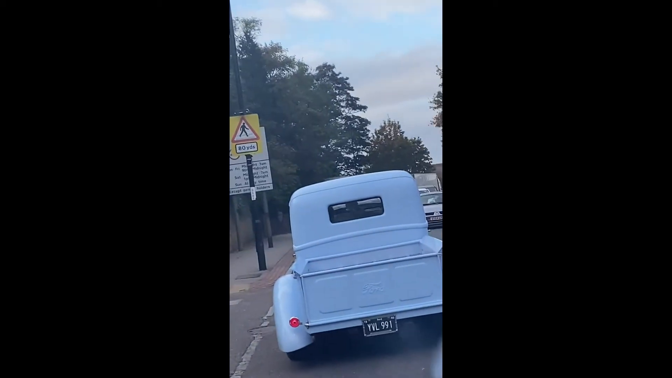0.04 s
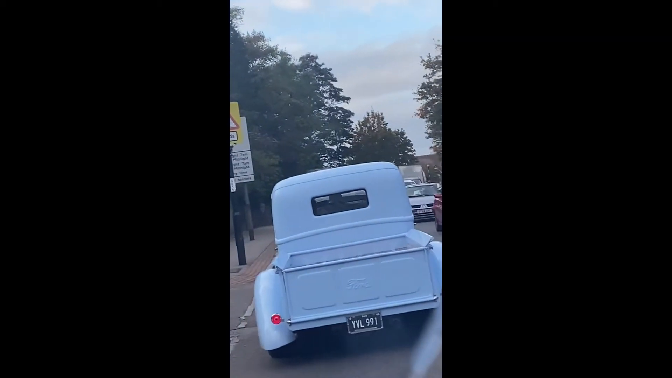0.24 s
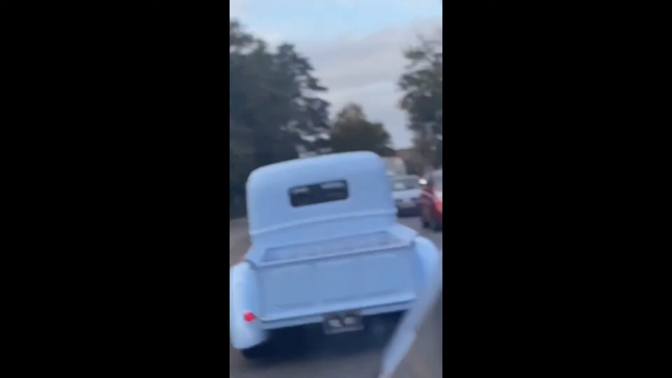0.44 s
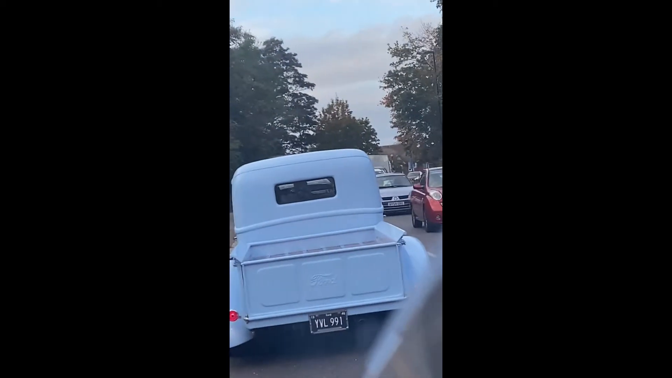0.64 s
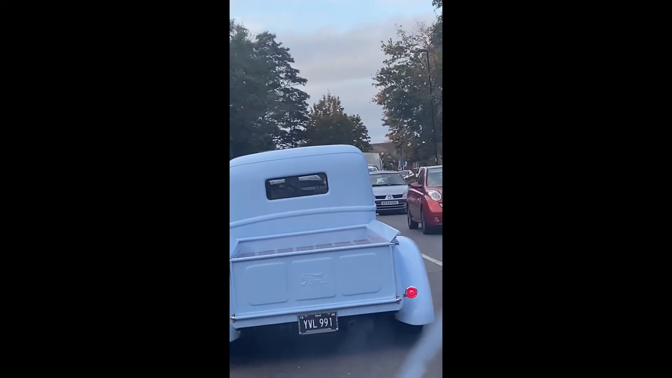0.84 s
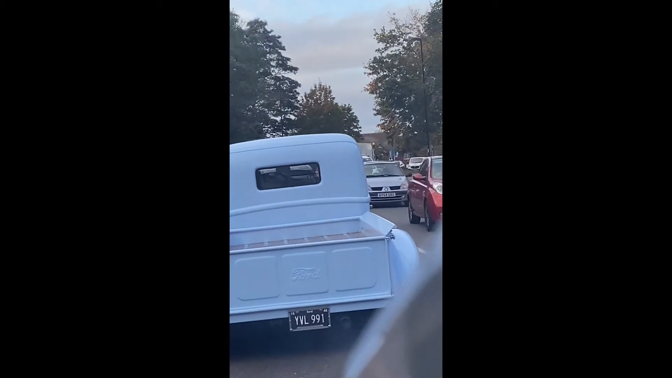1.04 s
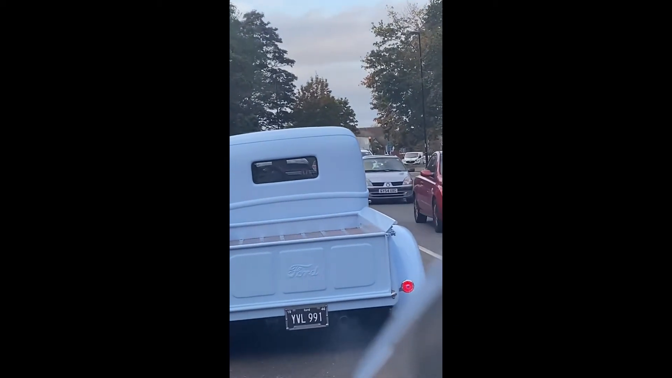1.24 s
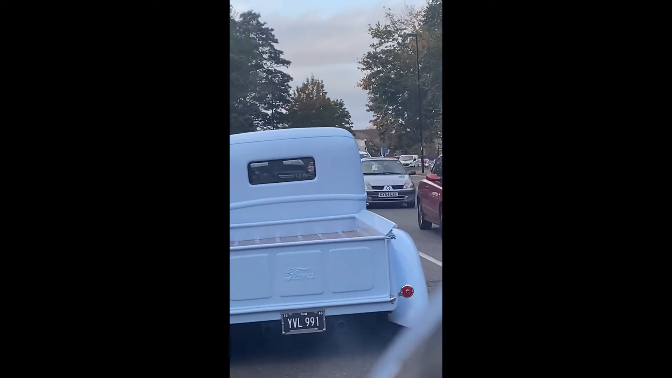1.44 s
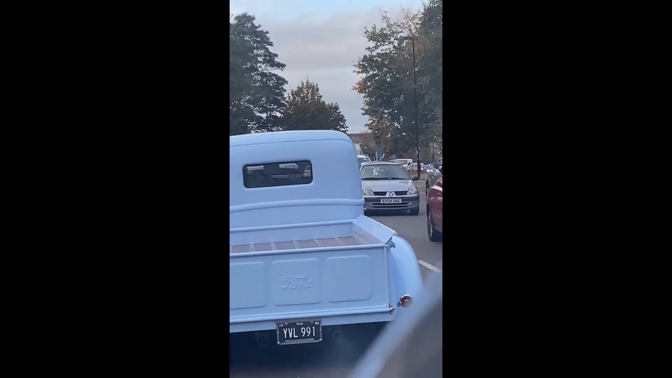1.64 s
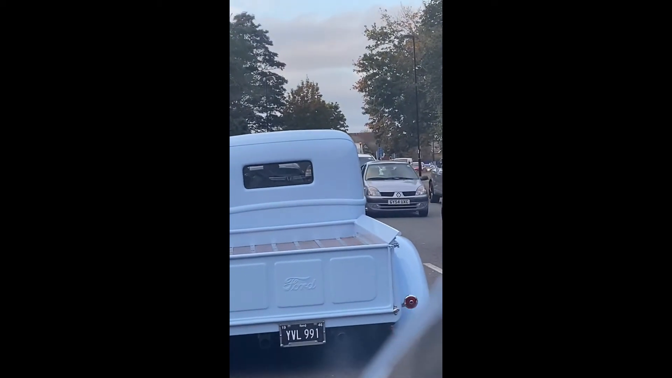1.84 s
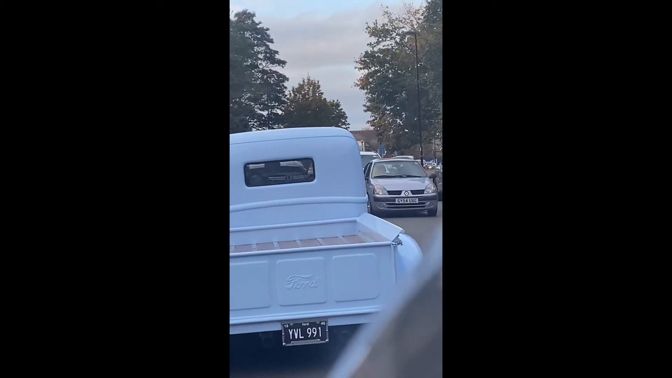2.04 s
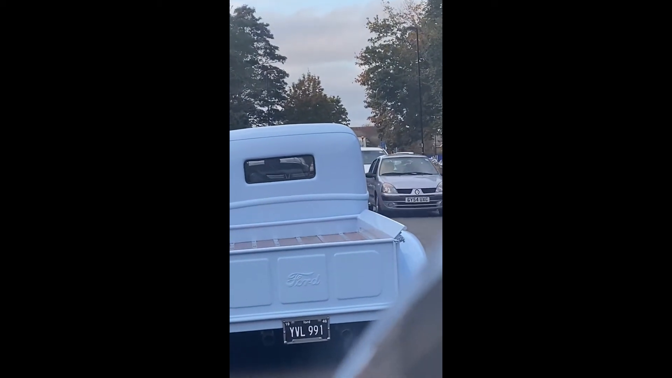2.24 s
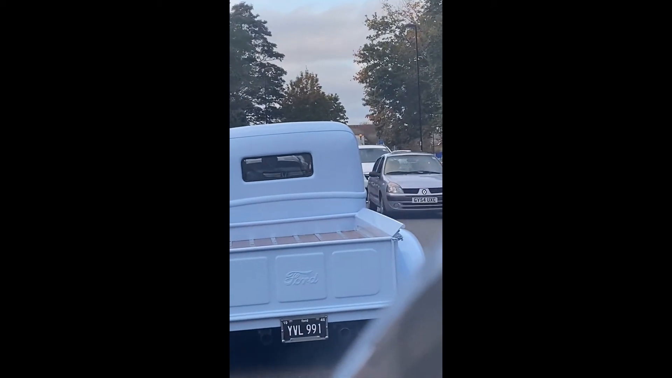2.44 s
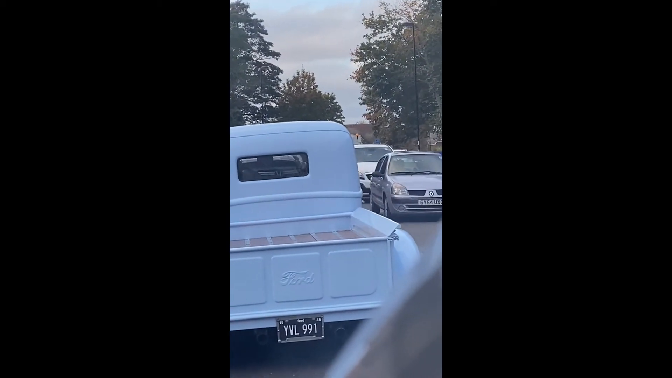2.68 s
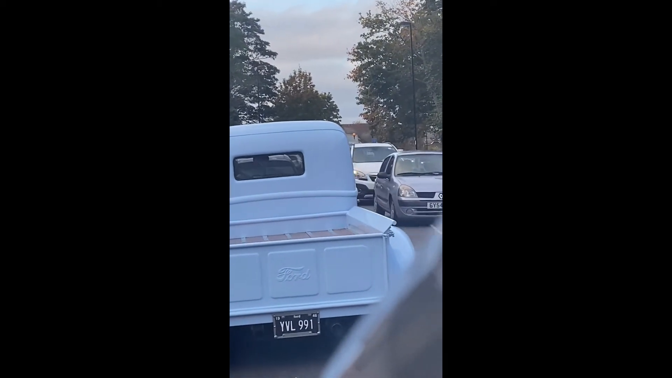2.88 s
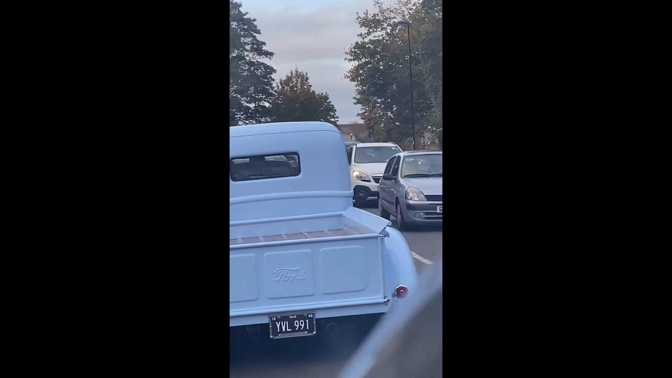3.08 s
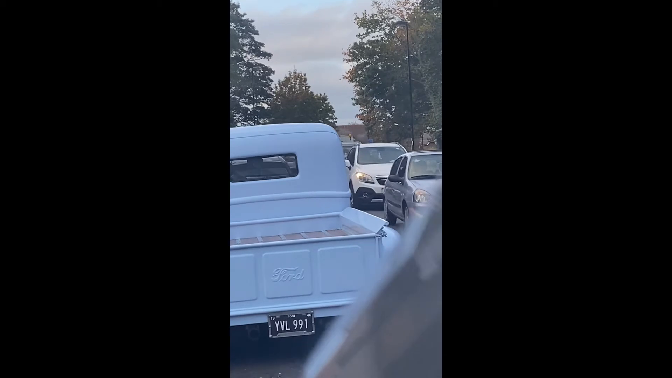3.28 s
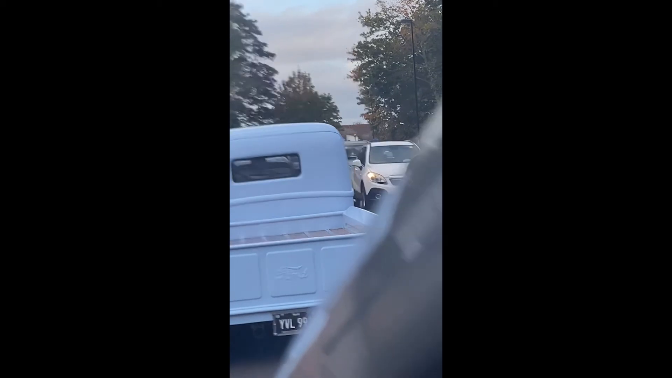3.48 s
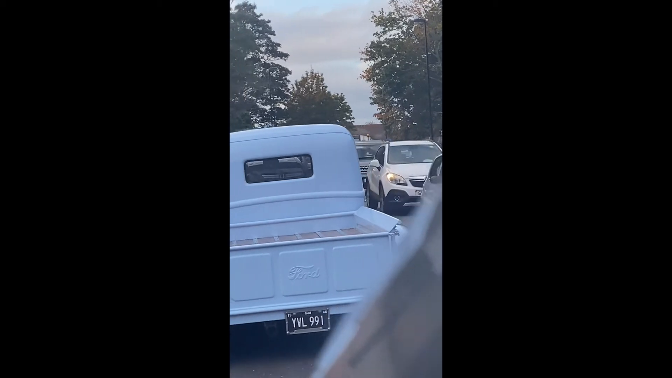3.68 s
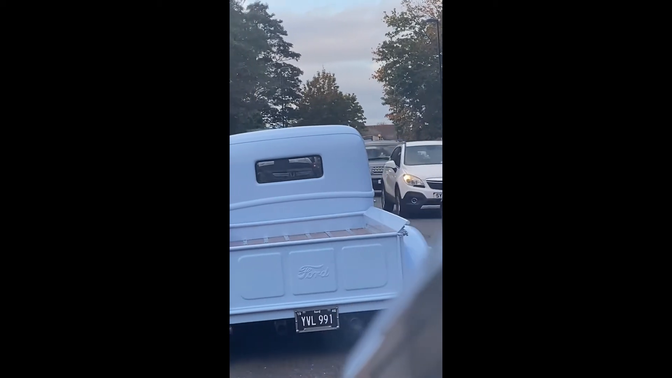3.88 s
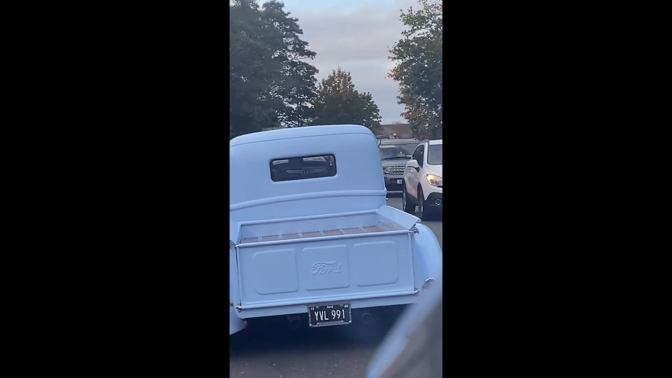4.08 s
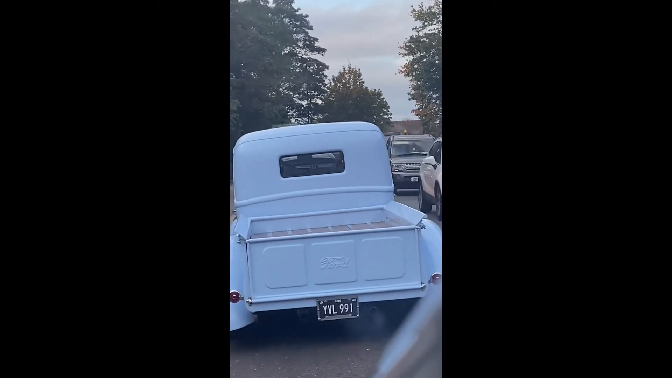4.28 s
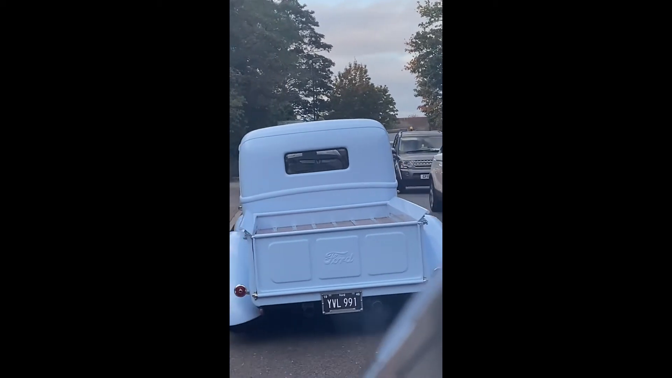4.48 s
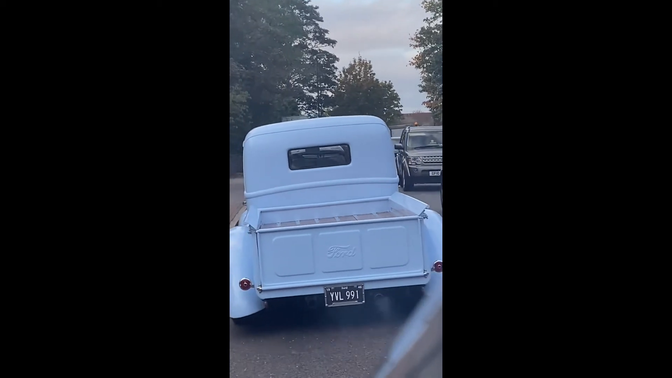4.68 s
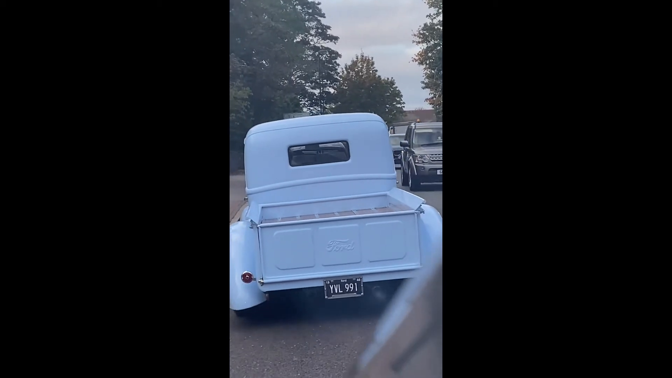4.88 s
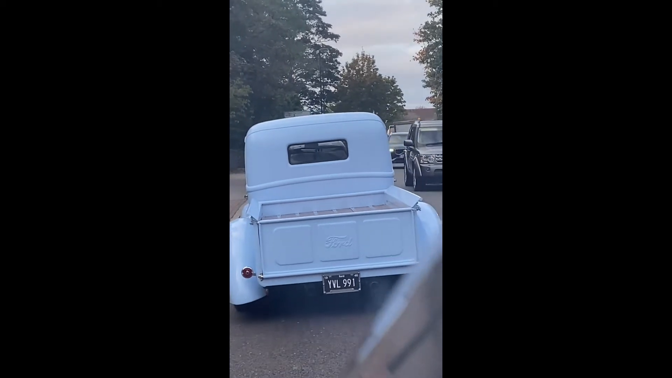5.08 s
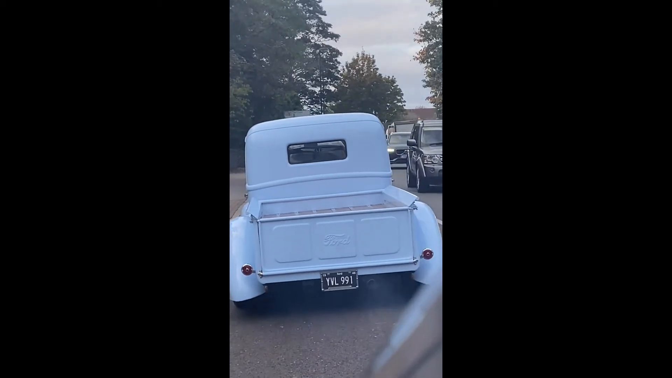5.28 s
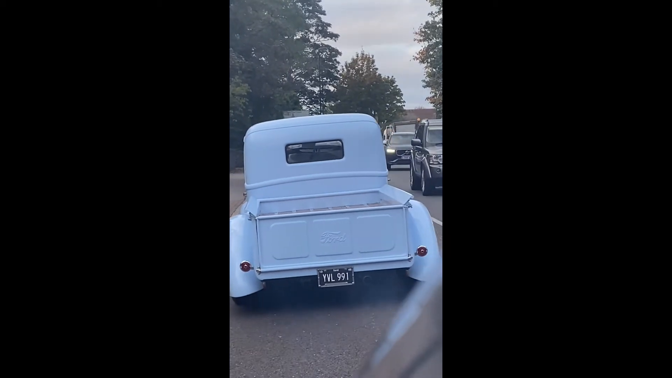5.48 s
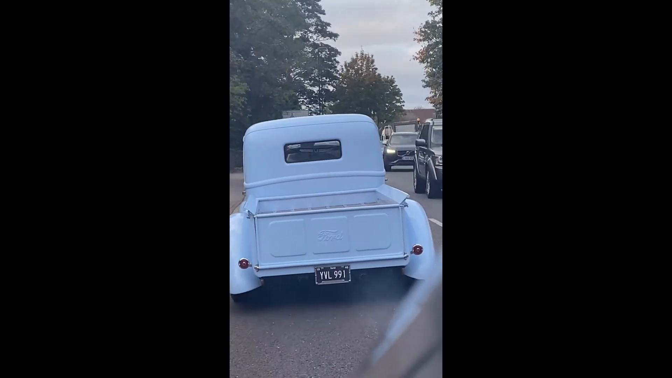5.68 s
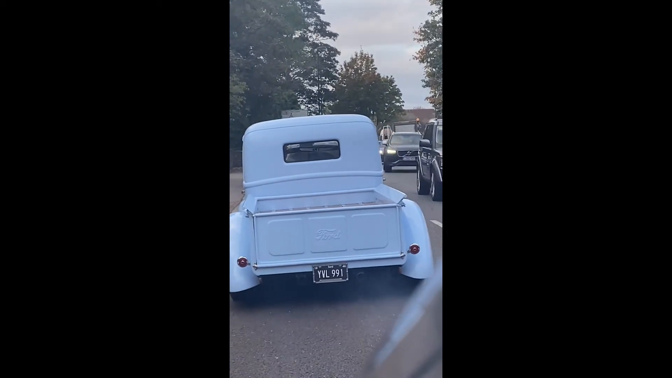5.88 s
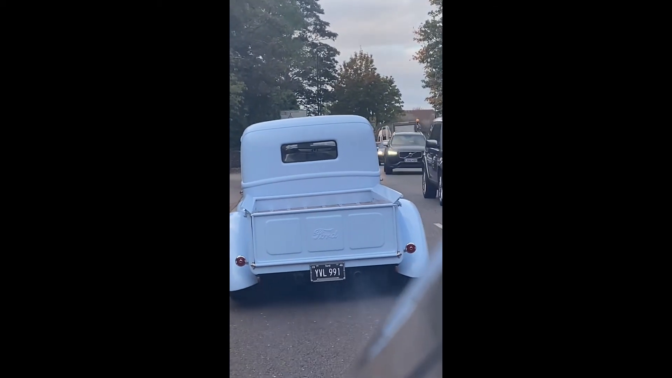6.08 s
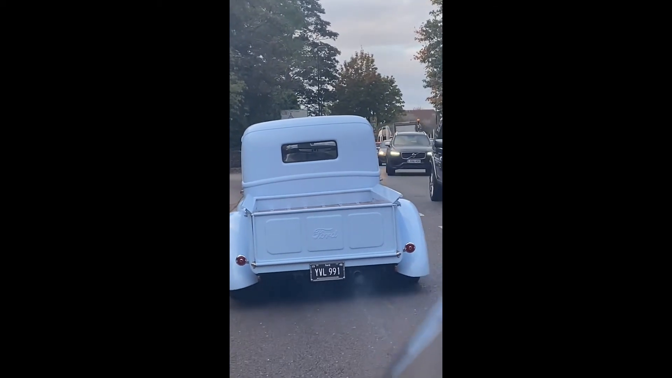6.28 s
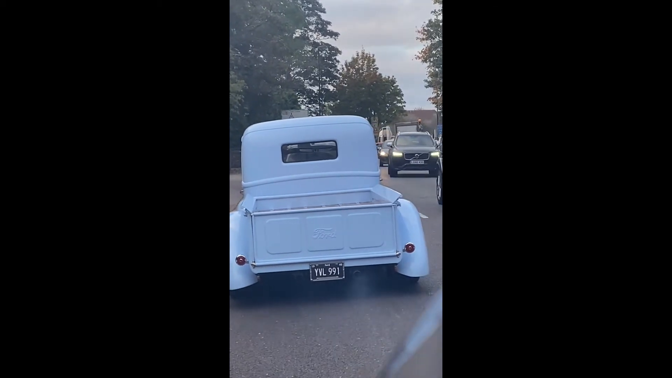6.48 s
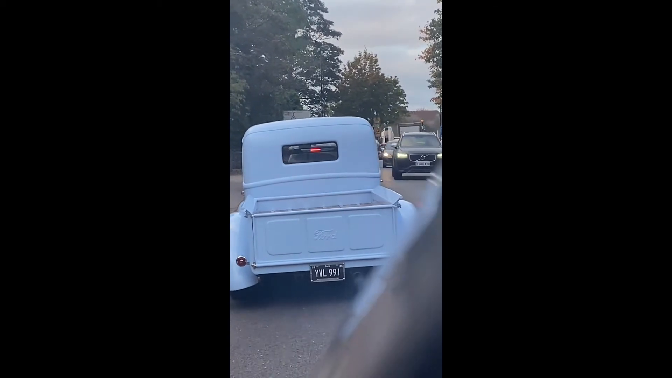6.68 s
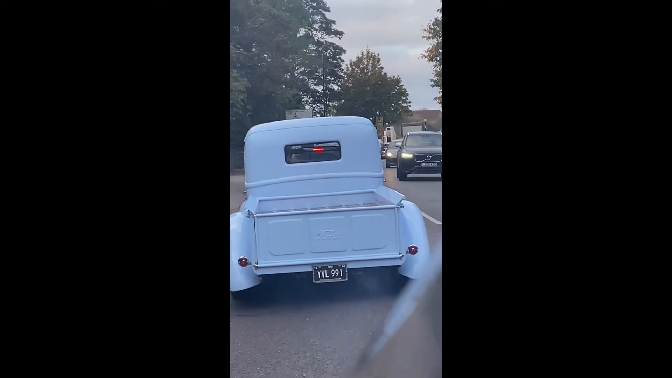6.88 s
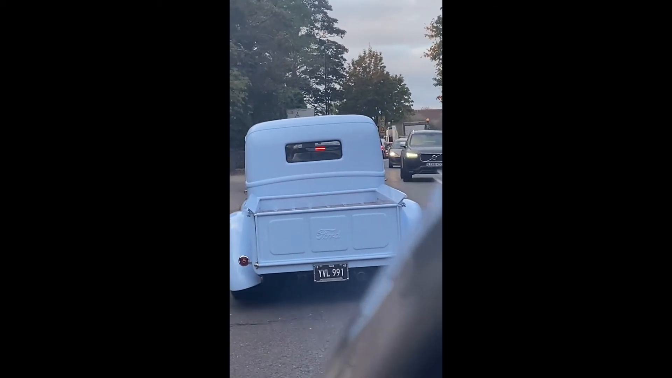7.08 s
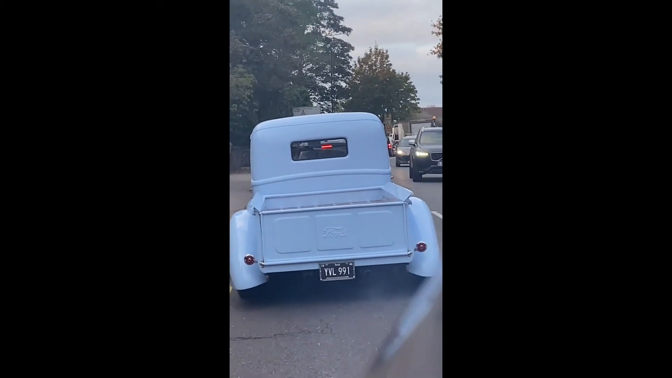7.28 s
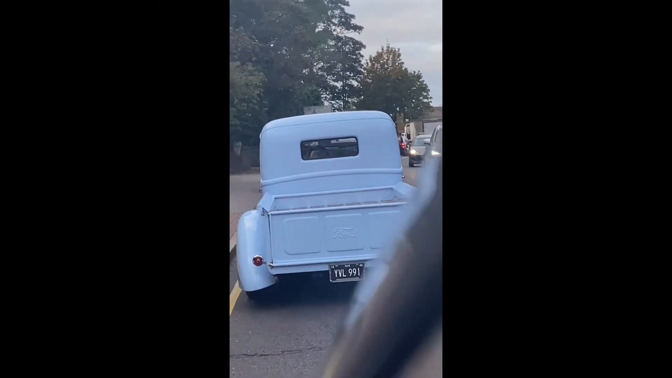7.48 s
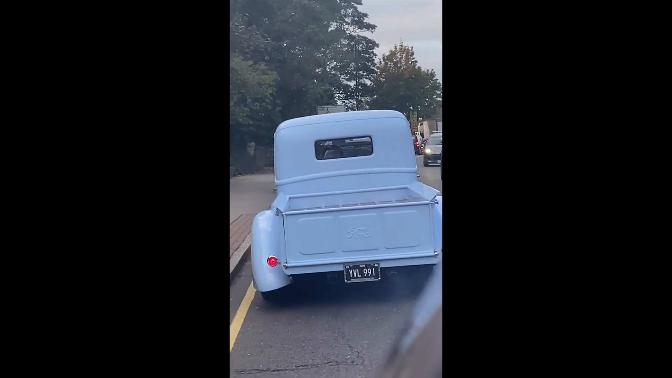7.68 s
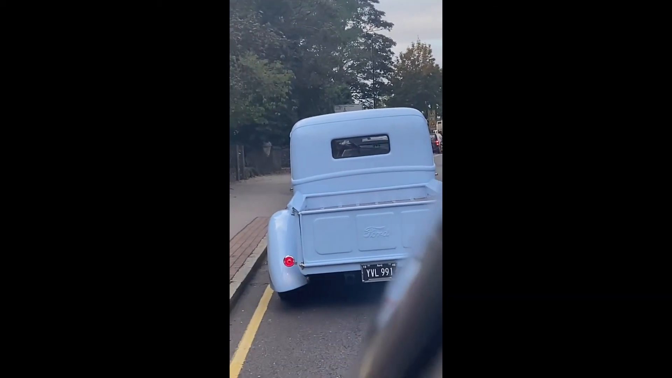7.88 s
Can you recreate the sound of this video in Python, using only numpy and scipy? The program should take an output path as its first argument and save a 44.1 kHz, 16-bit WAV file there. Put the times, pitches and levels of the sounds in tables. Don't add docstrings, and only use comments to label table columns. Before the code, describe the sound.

An old eight-cylinder pickup idles lumpily, then pulls away with a deep, uneven exhaust boom, faint brake squeals and tyre wash, heard from behind.

```python
import sys
import numpy as np
from scipy import signal
from scipy.io import wavfile
from scipy.ndimage import uniform_filter1d

SR = 44100
rng = np.random.default_rng(int(sys.argv[2]) if len(sys.argv) > 2 else 0)


def store_wav(level_fs):
    pcm = np.round(np.clip(np.atleast_2d(level_fs), -1, 1) * 32767)
    wavfile.write(sys.argv[1], SR, pcm.T.astype(np.int16))


def invert_db(level):
    return 10 ** (np.asarray(level, dtype=float) / 20)


N = 349933


def evened(x):
    return x / np.sqrt(np.mean(x ** 2) + 1e-20)


def read(points, hz):
    f, *values = np.transpose(points)
    return np.squeeze([np.interp(np.log(hz + 1), np.log(f + 1), v) for v in values])


def follow(rows, t):
    s, *values = np.transpose(rows)
    return np.squeeze([np.interp(t, s, v) for v in values])


def bump(t, s, half):
    return np.exp(-((t - s) / half) ** 2)


def ring(x, hz, width_hz):
    b, a = signal.iirpeak(hz, hz / width_hz, SR)
    once = signal.lfilter(b, a, x + 1e-18)
    return evened(signal.lfilter(b, a, once))


def resonate(x, hz, width_hz, lag_cycles=0):
    turn = np.exp(2j * np.pi * np.cumsum(hz * np.ones(len(x))) / SR)
    r = np.exp(-np.pi * width_hz / SR)
    slow = signal.lfilter([1 - r], [1, -r], x / turn + 1e-18)
    slow = signal.lfilter([1 - r], [1, -r], slow)
    return evened((turn * slow * np.exp(-2j * np.pi * lag_cycles)).real)


def noise(colour, patchy_db):
    frames, hz = N // 512 + 3, np.fft.rfftfreq(1024, 1 / SR)
    a, b, patches = rng.standard_normal((frames, 513, 3)).T
    patches = uniform_filter1d(patches, size=10, axis=0)
    patches = evened(uniform_filter1d(patches, size=6, axis=1))
    z = (a + 1j * b) * invert_db(read(colour, hz)[:, None] + patchy_db * patches)
    return evened(signal.istft(z, window="cosine", nperseg=1024, noverlap=512)[1][:N])


def puff(rise_s, fall_s):
    t = np.arange(6000) / SR
    shape = np.exp(-t / fall_s) * (1 - np.exp(-t / rise_s)) ** 2
    return shape / shape.max()


def knocks(rows, fall_s):
    t, out = np.arange(2000) / SR, np.zeros(N + 2000)
    shape = np.exp(-t / fall_s) * (1 - np.exp(-t / (0.15 * fall_s))) * 1.55
    for s, db, hz in rows:
        out[round(s * SR):][:2000] += invert_db(db) * shape * np.sin(2 * np.pi * hz * t)
    return out[:N]


# t/s, firing rate/Hz
FIRING_RATE = [(0.0, 51.18), (0.28, 51.34), (0.61, 55.87), (0.78, 53.15), (1.22, 54.7), (1.38, 57.73),
               (2.23, 52.14), (2.8, 52.93), (3.01, 51.95), (3.38, 51.91), (3.77, 60.57), (4.03, 58.59),
               (4.43, 62.21), (5.15, 63.85), (5.69, 66.14), (6.23, 61.05), (7.36, 58.46), (7.93, 58.87)]


def firing_hz(t):
    return follow(FIRING_RATE, t)


# t/s, level re full/dB
THROTTLE = [(0, -22.5), (.35, -29), (.45, -14), (.6, -24), (1.15, -26), (1.28, -18), (1.48, -6), (1.7, -12),
            (3.35, -12.5), (3.8, 0.5), (3.97, -4.5), (4.3, 0), (5.3, 0), (5.95, -0.5), (6.1, -3), (6.7, -5),
            (7.2, -5.5), (7.93, -6.5)]


def effort_db(t):
    return follow(THROTTLE, t)


def coasting(hz):
    COAST_HZ = 54.54
    return 1 / (1 + np.exp(hz - COAST_HZ))


def unclutched(t):
    CATCH_S, RISE_S = 1.15, 0.029
    return 1 / (1 + np.exp(np.minimum((t - CATCH_S) / RISE_S, 50)))


# t/s, lost push/share 0-1
WEAK_FIRINGS = [(.33, 0.5), (.74, 0.55), (.84, 0.14), (.97, 0.1), (1.532, 0.55), (1.66, 0.32), (1.79, 0.15),
                (2.117, 0.56), (2.419, 0.7), (2.733, 0.7), (3.027, 0.8), (3.344, 0.6), (3.752, 0.19),
                (3.883, 0.18), (4.02, 0.35), (4.149, 0.45), (4.42, 0.13), (5.071, 0.24), (5.78, 0.25),
                (5.998, 0.11), (6.299, 0.85), (6.403, 0.36), (6.97, 0.6), (7.104, 0.67), (7.229, 0.47),
                (7.52, 0.48), (7.649, 0.75), (7.786, 0.67)]


def run_ahead(t):
    DRAG, CATCH_UP_S = 0.27, 0.13
    return sum(DRAG * share * (t < s - .02) * np.exp(-abs(s - t) / CATCH_UP_S) for s, share in WEAK_FIRINGS)


def push_kept(when):
    lost = [np.clip(share, 0, 1) * bump(when + 0.032, s, 0.021) for s, share in WEAK_FIRINGS]
    return np.prod([1 - share for share in lost], axis=0)


# push/dB, lateness/firings, bark/dB, puff/dB, rasp/dB
CYLINDER_ROWS = [(1.5, 0.046, -28.5, 4, -18), (0, 0.039, 4.5, 9, -3.5), (3.5, 0.012, 11.5, 8, 11),
                 (-2, 0.02, -17.5, 2.5, -8), (3, -0.038, 10, 11, 4), (-2, 0.038, 4.5, 4.5, 5.5),
                 (6.5, -0.0069, -33, 2.5, 5.5), (-1.5, -0.027, 10.5, 5.5, 1)]
UPPER_RASP = [5, -6, -5, 0, -3.5, -14, 4.5, 9]


def firings(t):
    hz = firing_hz(t)
    turns = np.cumsum(hz) / SR - .6
    count = np.arange(-1, int(turns[-1]))
    push_db, late, bark_db, puff_db, rasp_db = np.transpose(CYLINDER_ROWS)[:, count % 8]
    chance = rng.standard_normal((len(count), 4)).T * [[.007], [.7], [1.0], [1.6]]
    when = np.interp(count + late + chance[0], turns, t)
    when = when - np.interp(when, t, run_ahead(t) / hz)
    kept = push_kept(when)

    def train(delay_firings, db):
        at = ((when + delay_firings / firing_hz(when)) * SR).astype(int)
        out = np.zeros(N)
        out[np.clip(at, 0, N - 1)] = kept * invert_db(db) if db is not gas_db else invert_db(db)
        return out

    gas_db = puff_db + chance[3]
    push_db = push_db + chance[1]
    even = 1 - 0.31 * coasting(firing_hz(when))
    return {"tone": train(0.865, even * push_db),
            "push": train(.9, push_db),
            "blow": train(.05, bark_db + chance[2]),
            "rasp": train(-0.1976, rasp_db + 2.0 * chance[2]),
            "upper": train(0.45, np.array(UPPER_RASP)[count % 8] + 0.5 * chance[2]),
            "gas": train(.1, gas_db)}


# t/s,
# half length/s, tone loss/dB, octave loss/dB, octave lag/cycles
ECHO_NULLS = [(.01, 0.07, -11, -5, 0), (0.353, 0.049, 5, 2, 0.014), (7.002, 0.022, -5, -2.5, 0.061),
              (0.502, 0.18, 13, 8, 0.19), (1.462, 0.23, 0, -3.5, -0.027), (2.9, 0.72, -1.5, 4.5, 0.092),
              (3.504, 0.1, -3.5, 7, -0.16), (4.103, 0.18, -0.5, -2.5, -0.093),
              (5.035, 0.17, 9, 1.5, -0.066), (5.448, 0.61, 4.5, 4, -0.15), (5.944, 0.085, -0.5, 8, -0.23),
              (6.56, 0.2, -4.5, 0.5, 0.16), (6.745, 0.37, 11, -2, -0.04), (7.102, 0.1, -1.5, 4.5, 0.05),
              (7.918, 0.094, 1, -5, 0.031)]


def boom(t, pulses):
    hz, effort, loose = firing_hz(t), effort_db(t), unclutched(t)
    coast = coasting(hz)
    tone_loss, octave_loss, echo_lag = sum(np.outer(loss, bump(t, s, half)) for s, half, *loss in ECHO_NULLS)
    tone_db = -15 + 0.027 * effort - 9.5 * loose - tone_loss
    octave_db = -12.5 + 0.62 * effort - 33 * loose - octave_loss
    swing = 0.6 - 4.5 * uniform_filter1d(run_ahead(t), size=800)
    octave_lag = 0.022 + echo_lag + swing * coast
    tone = invert_db(tone_db) * resonate(pulses["tone"], hz, 23.6)
    octave = invert_db(octave_db) * resonate(pulses["push"], 2 * hz, 43.6, octave_lag)
    third = invert_db(-33.5) * (1 - loose) * coasting(hz - 1) * resonate(pulses["push"], 3 * hz, 76, 0.17)
    drone = invert_db(-30.5) * bump(3.5 * hz, 223.8, 23) * resonate(pulses["blow"], 3.5 * hz, 12.0, 0.09)
    return tone + octave + third + drone


# f/Hz, width/Hz, level/dB
PIPE_MODES = [(51, 15, -6), (87.3, 18, -16), (108.4, 22, -3), (148.3, 22, -3.5), (219.4, 15.4, 2),
              (265, 33, -12), (338.8, 14.7, -10.5), (412, 9.4, -27), (441.6, 10.2, -16), (480, 14, -31),
              (560, 18, -32), (593, 12, -28), (686, 32, -25.5)]
# t/s, half length/s, lower modes/dB, upper modes/dB
SHORT_SWELLS = [
    (0.148, .25, 1, -5),
    (.9, .2, 2, 1),
    (3.4, 0.25, 6, 3),
    (4.1, .25, -2, -2.5),
    (5.2, 0.32, 2, 1.5),
    (5.69, 0.39, -5.5, 2.5),
    (6.153, .08, -6, -10),
    (6.602, 0.26, 1.5, -6),
    (7.5, 0.25, 7, 3),
]
# t/s, half length/s, level/dB
MIDDLE_SWELLS = [
    (2.2, 0.21, -2.5),
    (2.7, 0.13, 1.5),
    (3.446, 0.2, 1),
    (3.696, .1, 2),
    (4.51, .12, -2),
    (6.278, 0.067, 4),
    (6.92, .1, 5),
    (7.307, 0.17, 2),
    (7.8, 0.12, 3),
]
# t/s, half length/s, level/dB
IDLE_SINGING = [
    (.08, .04, -39),
    (0.47, .06, -27.5),
    (.37, 0.026, -35),
    (.6, 0.08, -34.5),
]


def pipes(t, pulses):
    LONG_BELOW_HZ, SHORT_ABOVE_HZ, UPPER_FROM_HZ, UPPER_TO_HZ = 180, 300, 400, 500
    effort, loose = effort_db(t), unclutched(t)
    lower_db, upper_db = sum(np.outer(db, bump(t, s, half)) for s, half, *db in SHORT_SWELLS)
    long_gain = invert_db(-0.33 * effort * (1.5 - 1.3 * loose))
    middle_gain = invert_db(sum(db * bump(t, s, half) for s, half, db in MIDDLE_SWELLS))
    bark = np.zeros(N)
    for k, (f, width_hz, db) in enumerate(PIPE_MODES):
        if f < SHORT_ABOVE_HZ:
            blow = pulses["blow"]
            gain = long_gain if f < LONG_BELOW_HZ else middle_gain
        else:
            blow = pulses["upper"] if UPPER_FROM_HZ < f < UPPER_TO_HZ else pulses["rasp"]
            gain = invert_db(0.3 * effort + (upper_db if f > UPPER_FROM_HZ else lower_db))
        bark += (-1) ** k * invert_db(db) * gain * ring(blow, f, 1.5 * width_hz)
    sing = sum(invert_db(db) * bump(t, s, half) for s, half, db in IDLE_SINGING)
    return invert_db(-24.5 + effort) * bark + sing * np.sin(2 * np.pi * 219.8 * t)


# f/Hz, density/dB
GAS_COLOUR = [(600, -28), (1200, -43), (2200, -9.5), (3000, -15.5), (5500, -15.5), (10000, -26.5),
              (16000, -31)]


def gas_hiss(t, pulses):
    PULL_S, LIFT_S = 3.5, 5.95
    pull_db = 3.5 * (t > PULL_S) * np.exp(-abs(t - PULL_S) / 0.55)
    lift_db = -3.5 * np.clip((t - LIFT_S) / 0.059 + 1, 0, 1)
    gate = signal.oaconvolve(pulses["gas"], puff(0.0033, 0.013))[:N]
    return invert_db(-46 + 0.05 * effort_db(t) + pull_db + lift_db) * evened(gate) * noise(GAS_COLOUR, 0.38)


def engine(t):
    pulses = firings(t)
    return boom(t, pulses) + pipes(t, pulses) + gas_hiss(t, pulses)


# f/Hz, density/dB
CHUFF_COLOUR = [(250, -36), (400, 0.5), (700, 3), (1000, -1), (1600, -23.5), (3000, -32), (16000, -74)]
# t/s, peak level/dB, knock f/Hz
GAS_LUMPS = [(0.518, -28, 657), (0.4, -25, 520), (0.694, -22.5, 440), (0.744, -27, 501), (0.768, -28, 480),
             (0.802, -26, 520), (0.837, -26.5, 560), (1.113, -27, 587), (1.155, -22, 633),
             (1.269, -21, 640), (1.43, -23, 650), (1.455, -34, 610), (1.568, -27, 656), (1.681, -27, 479),
             (1.712, -20.5, 426), (1.822, -25.5, 450), (1.862, -26, 590), (2.009, -21, 549),
             (2.18, -25, 600), (2.218, -27, 403), (2.315, -26, 610), (2.525, -30, 401), (2.601, -23, 440),
             (2.916, -20, 426), (3.133, -27, 586), (3.227, -26, 554), (3.383, -22, 483), (3.437, -25, 520),
             (3.525, -23, 600), (3.579, -24, 437), (3.668, -23, 433), (3.882, -27, 474), (3.935, -21, 950),
             (4.037, -25, 440), (4.071, -20, 456), (4.171, -24.5, 450), (4.204, -22, 460),
             (4.465, -19, 526), (4.493, -32, 452), (4.639, -25, 415), (4.847, -30, 567), (5.054, -33, 436),
             (5.198, -21.5, 401), (5.224, -33, 431), (5.465, -25, 656), (5.502, -27, 462),
             (5.585, -32, 686), (6.07, -43, 840), (6.298, -36, 427), (6.49, -23, 800), (6.62, -25, 447),
             (6.755, -20.5, 580), (7.158, -22, 906), (7.208, -26, 401), (7.394, -24.5, 437),
             (7.44, -23.5, 1080), (7.563, -24.5, 900), (7.702, -24, 940), (7.84, -26, 567)]


def chuffs():
    at = np.zeros(N)
    for s, db, hz in GAS_LUMPS:
        at[round(s * SR)] = invert_db(db - 10.5)
    lumps = signal.oaconvolve(at, puff(0.0034, 0.019))[:N] * noise(CHUFF_COLOUR, 1.1)
    return lumps + invert_db(-4.5) * knocks(GAS_LUMPS, fall_s=0.0045)


# t/s, peak level/dB, f/Hz
LATE_BLATS = [(2.33, -27, 443), (2.82, -29.5, 444), (3.09, -35, 420), (3.145, -28, 327), (3.25, -20, 230),
              (3.51, -35, 423), (4.39, -25, 285), (4.72, -27, 285), (5.08, -29, 290), (6.27, -19, 260),
              (6.29, -40, 433), (7.12, -24.5, 334), (7.208, -27, 282), (7.258, -34.5, 332),
              (7.423, -18.5, 273), (7.52, -23, 333), (7.667, -31, 267), (7.74, -25.5, 325)]


def blats():
    return knocks(LATE_BLATS, fall_s=0.014)


# t/s, peak level/dB, f/Hz
METAL_TICKS = [(0.839, -35, 4060), (0.9394, -33, 5960), (1.1129, -37, 6000), (1.2421, -39, 2550),
               (1.3443, -32, 2550), (1.4316, -33, 3270), (2.4109, -38, 3470), (2.4673, -42, 2510),
               (2.5252, -32, 3250), (2.7694, -39, 2520), (2.9178, -37, 2640), (3.019, -37, 4250),
               (3.0375, -35, 3740), (3.1896, -33, 3240), (3.3473, -33.5, 5830), (3.5304, -40, 2750),
               (3.5478, -32, 2530), (3.5828, -34, 3600), (3.6341, -40, 2820), (3.6696, -36, 2720),
               (3.7184, -34, 4080), (3.7678, -34, 2660), (4.0372, -34, 3000), (4.123, -34, 2740),
               (4.255, -39, 2690), (4.336, -33, 2400), (4.434, -39, 2680), (4.466, -37, 2530),
               (4.721, -38, 2410), (4.847, -36, 2440), (5.303, -36, 5400), (5.425, -39, 2540),
               (5.543, -33, 5230), (5.746, -40, 2400), (5.868, -37, 2410), (6.621, -30.5, 2620),
               (6.754, -39, 2610), (7.019, -39, 2430), (7.43, -36, 2470), (7.703, -33, 2480)]


def ticks():
    return invert_db(0.5) * knocks(METAL_TICKS, fall_s=0.0015)


def squeal(row, waver_hz, octave_db):
    start, top, end, peak_db, hz = row
    t = np.arange(start, end, 1 / SR)
    a, b = rng.standard_normal((SR // 2 + SR // 10, 2))[:len(t)].T
    turns = np.cumsum(hz + waver_hz * evened(uniform_filter1d(a, size=150))) / SR
    octave = invert_db(octave_db + 1.5 * (peak_db + 41)) * np.cos(4 * np.pi * turns)
    whistle = np.cos(2 * np.pi * turns) + octave
    fuzz = 0.76 * resonate(b, hz, 1.5 * waver_hz)
    away = np.where(t < top, (top - t) / (top - start), (t - top) / (end - top))
    flutter_db = 1.2 * evened(uniform_filter1d(b, size=500))
    level_db = peak_db - 19.5 * away ** 1.57 + flutter_db
    out = np.zeros(N)
    out[round(start * SR):][:len(t)] = invert_db(level_db) * (whistle + fuzz)
    return out


# start t/s, loudest t/s, end t/s, peak level/dB, f/Hz
LOW_SQUEALS = [
    (0.868, 0.936, 1.09, -42.5, 6040),
    (0.99, 1.09, 1.17, -51.5, 5960),
    (1.521, 1.58, 1.61, -43.5, 5910),
    (1.572, 1.65, 1.744, -38.5, 5916),
    (1.691, 1.735, 1.79, -49, 5900),
]
HIGH_SQUEALS = [
    (.77, .8, .85, -57, 8440),
    (1.072, 1.165, 1.24, -55, 8450),
    (1.152, 1.25, 1.42, -53, 8620),
    (1.38, 1.553, 1.64, -56, 8460),
    (1.548, 1.693, 1.92, -49.5, 8530),
    (1.844, 2.025, 2.2, -59, 8430),
    (2.803, 3.023, 3.27, -54.5, 8480),
    (3.914, 4.155, 4.42, -48.5, 8460),
]


def brakes():
    low = sum(squeal(row, 51, -27) for row in LOW_SQUEALS)
    high = sum(squeal(row, 82.0, -56) for row in HIGH_SQUEALS)
    return invert_db(8.0) * (low + high)


# f/Hz, density/dB
ROAD_COLOUR = [(25, -23.5), (45, 14), (120, 5.5), (185, -3.5), (290, -2.5), (400, -4.5), (1000, -12.5),
               (1500, -14), (2300, -20), (2800, -27.5), (5500, -33.5), (8000, -32), (12000, -46),
               (14000, -46), (16500, -65)]
# f/Hz, width/Hz, level/dB
PANEL_HUM = [(889, 12, -49), (988, 45, -52), (222, 20, -50)]


def road(t):
    hum = sum(invert_db(db) * ring(rng.standard_normal(N), f, width_hz) for f, width_hz, db in PANEL_HUM)
    still_db = -19 * np.clip((1.16 - t) / .2, 0, 1)
    gap_db = -4 * np.clip((t - 3.8) / 0.27, 0, 1)
    wash = invert_db(-25 + 0.12 * effort_db(t)) * noise(ROAD_COLOUR, 1.5)
    return wash + invert_db(still_db + gap_db) * hum


# f/Hz, density/dB
LEAVING_COLOUR = [(250, -41), (500, 0.5), (1000, 1), (1700, -2), (2400, -10.5), (4000, -33), (16000, -46)]


def leaving_car(t):
    level_db = -38.5 - 6.5 * (np.maximum(t - 0.1, 0) / 1.34) ** 2
    side = np.array([[.42], [-.42]]) * noise(LEAVING_COLOUR, 1.9)
    return invert_db(level_db) * (noise(LEAVING_COLOUR, 1.6) + side)


# f/Hz, density/dB
WIND_COLOUR = [(30, -13), (70, -6), (150, 10), (300, -4), (500, -20), (1000, -33), (2000, -54),
               (16000, -56)]
# t/s, half length/s, level/dB
WIND_GUSTS = [
    (0.293, 0.42, -37.5),
    (1.558, 0.6, -34.5),
    (3.75, .06, -70),
    (6.213, 0.058, -26),
    (6.502, 0.24, -33.5),
    (7.053, 0.12, -27.5),
    (7.553, 0.23, -27),
]


def wind(t):
    level = invert_db(-56.5) + sum(invert_db(db) * bump(t, s, half) for s, half, db in WIND_GUSTS)
    return level * np.array([noise(WIND_COLOUR, 0.99), noise(WIND_COLOUR, 2.6)])


# f/Hz, density/dB
TRAFFIC_COLOUR = [(150, -23), (300, -8.5), (600, 4.5), (900, -7.5), (1600, -25.5), (3000, -24),
                  (16000, -68)]


def traffic():
    return invert_db(-52.5) * np.array([noise(TRAFFIC_COLOUR, 3.2), noise(TRAFFIC_COLOUR, 3.0)])


# f/Hz, density/dB
HISS_COLOUR = [(700, -6), (1500, 11), (3000, -7), (5000, 1), (9000, 3.5), (11500, -3), (12500, -37),
               (16000, -38)]


def port_hiss():
    return invert_db(-63) * np.array([noise(HISS_COLOUR, 1.1), noise(HISS_COLOUR, 1.1)])


# f/Hz, left minus right/dB
LEVEL_STEP = [(110, 0), (220, 1), (400, 1.7), (700, 1.6), (1300, .6), (2400, 0)]
# f/Hz, settling t/s, extra left/dB, extra left lead/rad
EARLY_WIDTH = [(55, 3.0, 4.1, .9), (120, 2.2, 3.9, .9), (220, 1.9, .3, .95), (340, .62, 0, 2.2),
               (600, .42, 0, 2.9), (900, .3, 0, -.6), (1500, 1.4, .6, 0), (4000, 1, 0, 0)]
# f/Hz, left lead/rad
PHASE_STEP = [(5080, 0), (6980, 2.75), (8100, 3.25), (9730, 5.8), (11600, 6.1), (12600, 8.8), (14400, 9.2),
              (15600, 11.9)]


def ports(x):
    hz, t, z = signal.stft(x, SR, nperseg=2048)
    settles_s, wide_db, wide_rad = read(EARLY_WIDTH, hz)[:, :, None]
    wide = 1 / (1 + np.exp((t - settles_s) / .15))
    step = invert_db(read(LEVEL_STEP, hz)[:, None] + wide * wide_db) * np.exp(1j * wide * wide_rad)
    turn_rad = np.interp(hz, *np.transpose(PHASE_STEP)) + .25 * np.clip(hz / 2000 - .5, 0, 1)
    drift_rad = .1 * evened(uniform_filter1d(rng.standard_normal(len(t)), size=3))
    half = np.sqrt(step) * np.exp(.5j * (turn_rad[:, None] + np.outer(hz > 5000, drift_rad)))
    return signal.istft(np.array([z * half, z / half]), SR, nperseg=2048)[1][:, :N]


def scene():
    t = np.arange(N) / SR
    truck = engine(t) + chuffs() + blats() + ticks()
    ahead = ports(truck + brakes() + road(t))
    return ahead + leaving_car(t) + wind(t) + traffic() + port_hiss()


def band_limit(x):
    return signal.sosfilt(signal.butter(12, 17100, fs=SR, output="sos"), x)


def record(dry):
    bass_cut = signal.butter(4, 38, "highpass", fs=SR, output="sos")
    top_cut = signal.firwin(255, 15750, fs=SR)
    mix = signal.oaconvolve(signal.sosfiltfilt(bass_cut, dry), top_cut[None], "same")
    return band_limit(mix)


dry = scene()
out = record(dry)
store_wav(out)
```